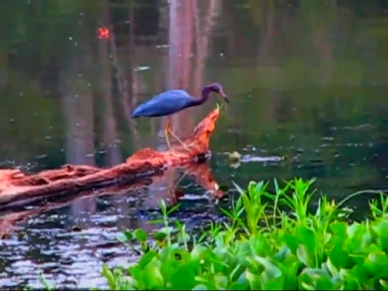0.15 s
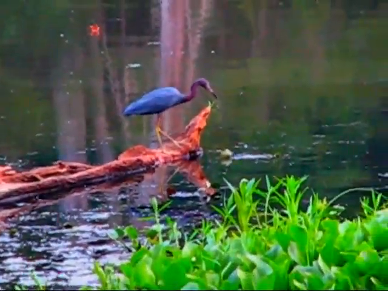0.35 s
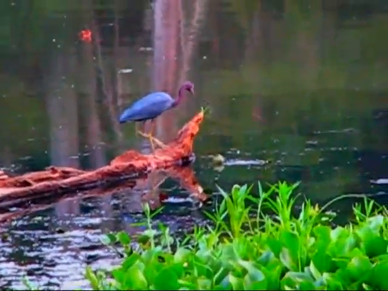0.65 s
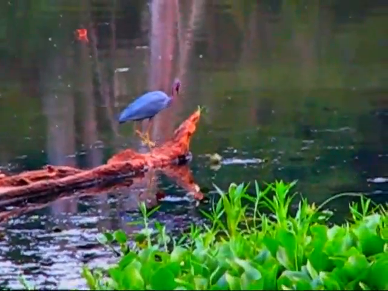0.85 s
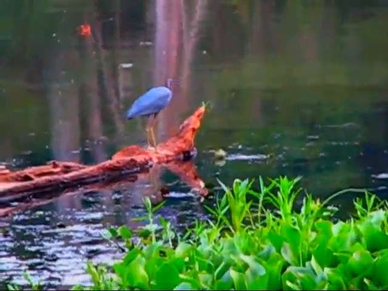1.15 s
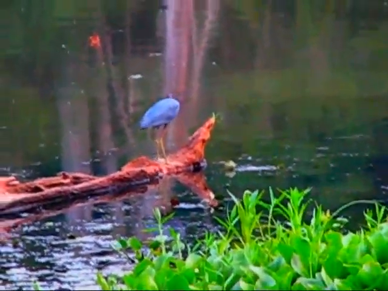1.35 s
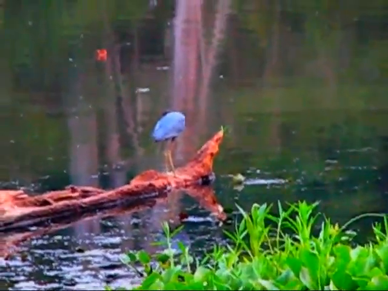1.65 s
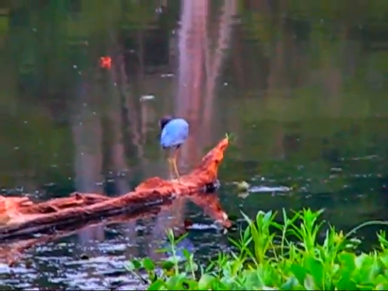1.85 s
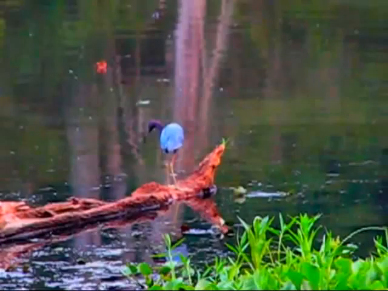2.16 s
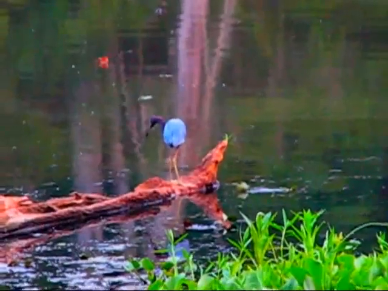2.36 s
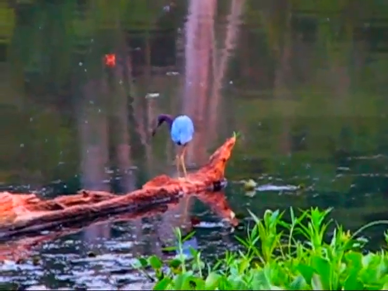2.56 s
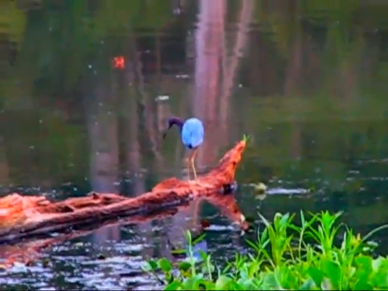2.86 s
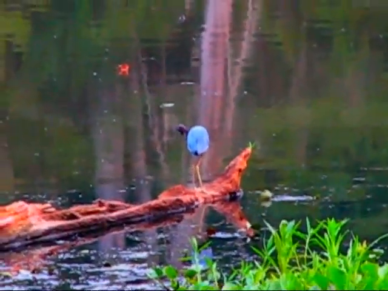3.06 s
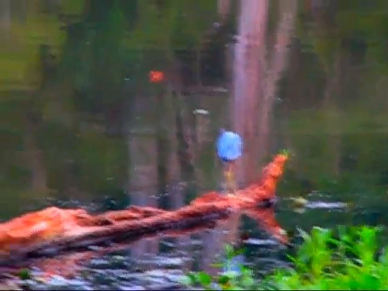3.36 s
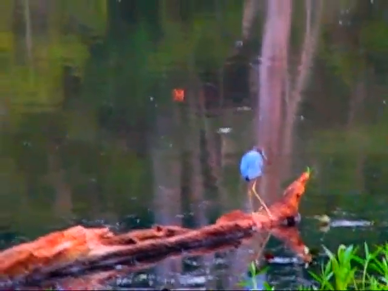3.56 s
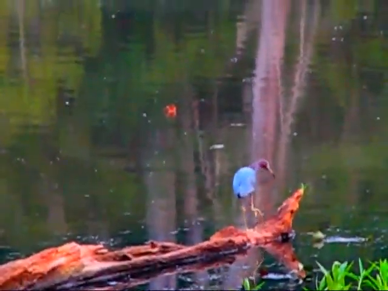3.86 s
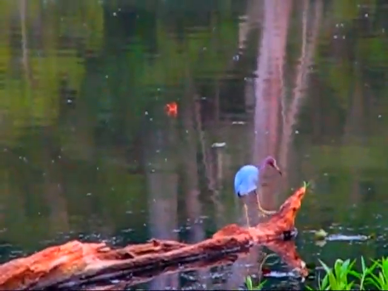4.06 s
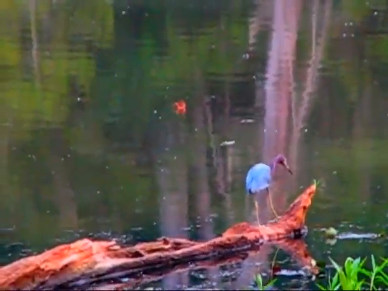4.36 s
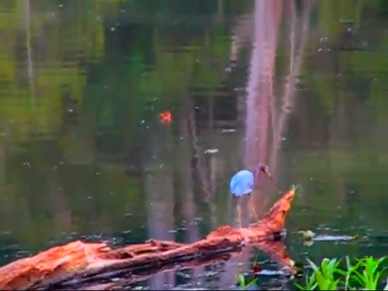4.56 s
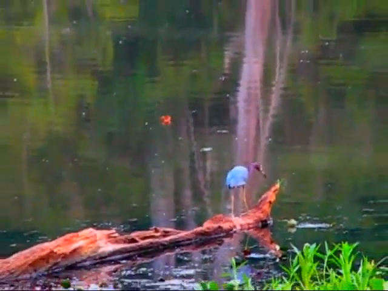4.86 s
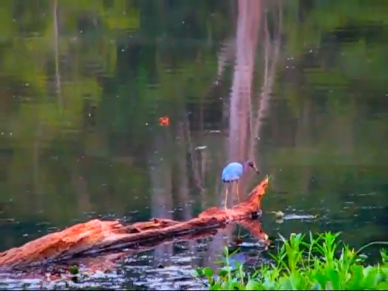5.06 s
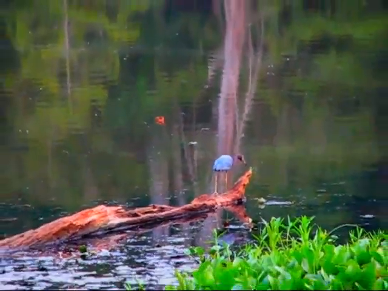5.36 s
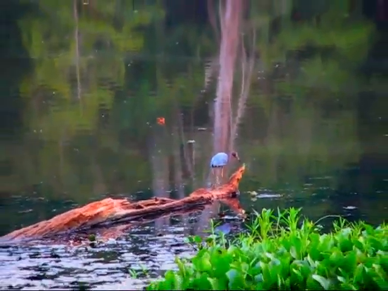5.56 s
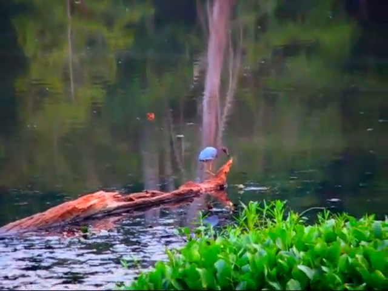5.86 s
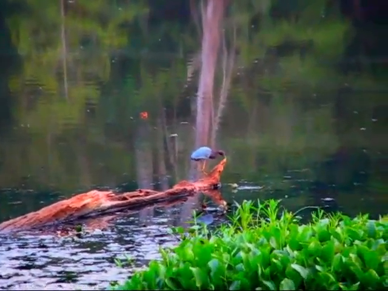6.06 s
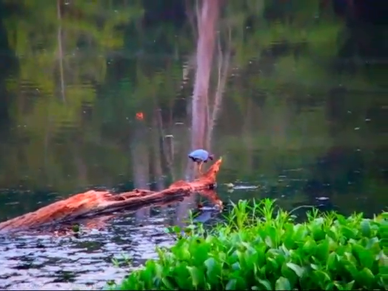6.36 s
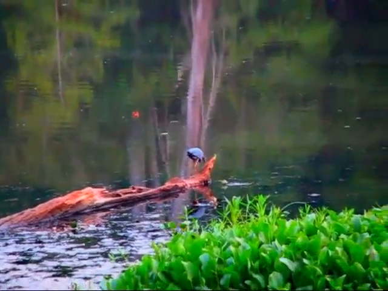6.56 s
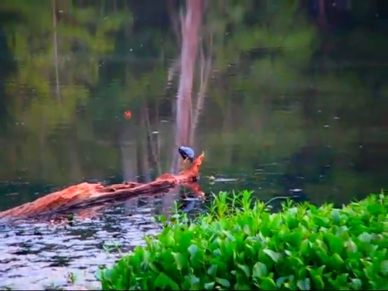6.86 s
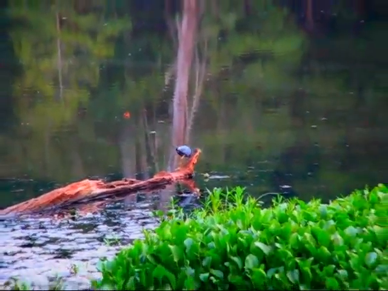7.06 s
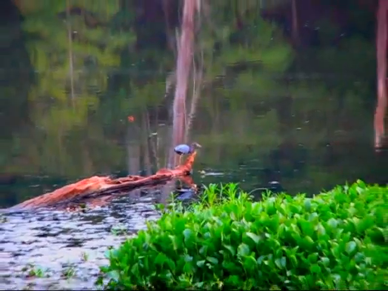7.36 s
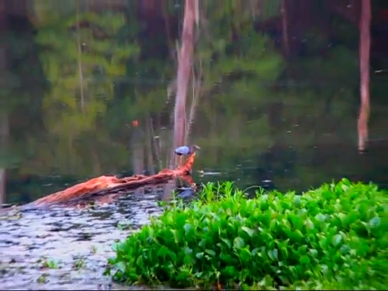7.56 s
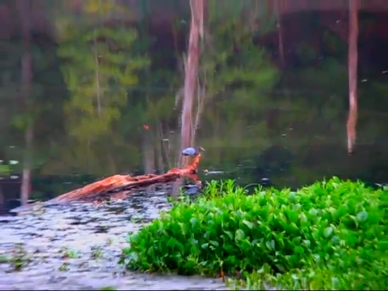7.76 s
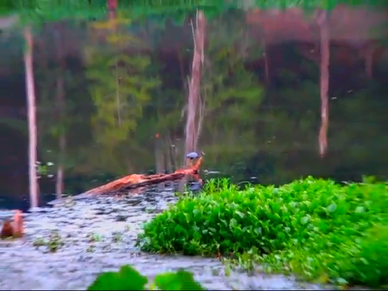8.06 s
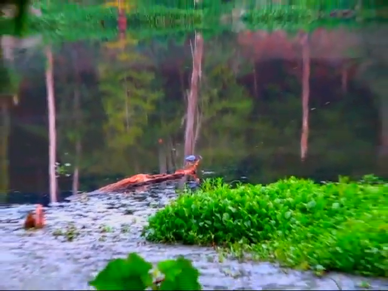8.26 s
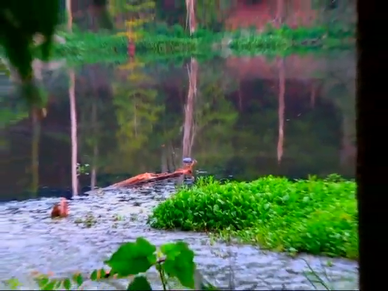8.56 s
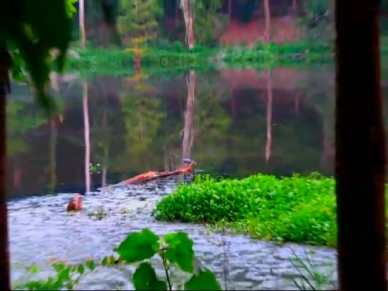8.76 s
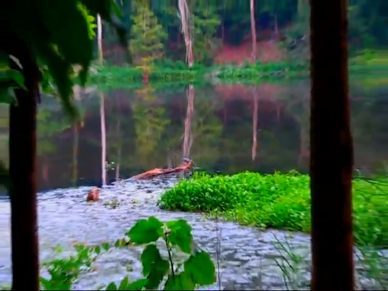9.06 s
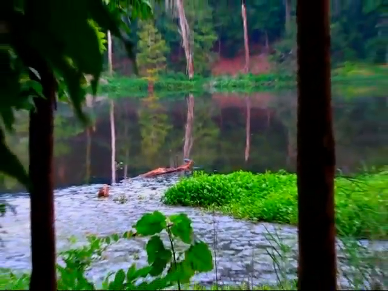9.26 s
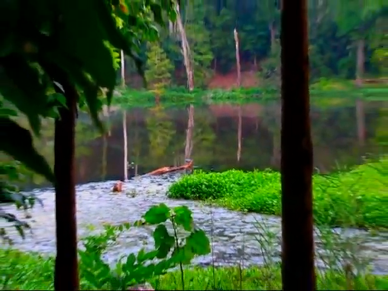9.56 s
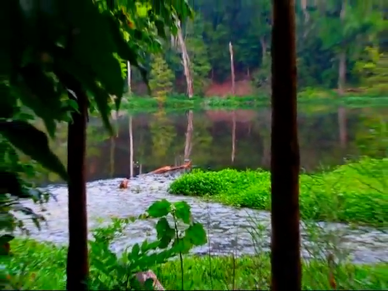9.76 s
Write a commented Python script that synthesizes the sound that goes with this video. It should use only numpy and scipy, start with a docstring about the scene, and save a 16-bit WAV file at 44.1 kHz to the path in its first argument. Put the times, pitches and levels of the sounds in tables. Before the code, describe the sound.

Summer pond insects shimmer continuously at high pitch while small frogs call back and forth; handling knocks arrive near six seconds, then a faint ticking zoom motor.

```python
"""A summer pond at dusk, heard at a hand-held camera: a wall of far cicadas over a low landscape hum,
with one nearer cicada, a near cricket trilling, katydids buzzing high up and tree frogs trading pulsed notes.
Crowds are shaped random spectra, cricket strokes sliding tones, and frog notes stacks of harmonics.
Knocks and thuds ring through the camera body; later the lens motor starts and rattles as random clicks."""
import sys
import numpy as np
from scipy import signal
from scipy.io import wavfile
from scipy.ndimage import uniform_filter1d

SR = 44100
rng = np.random.default_rng(int(sys.argv[2]) if len(sys.argv) > 2 else 0)


def store_pcm(level_fs):
    """Save levels as 16-bit WAV."""
    pcm = np.round(np.clip(level_fs, -1, 1) * 32767).astype(np.int16)
    wavfile.write(sys.argv[1], SR, np.atleast_2d(pcm).T)


N = 437031

# slow changes of the insects: time_s, cricket_db (before trim), katydids_db,
# second_colour_share (0-1), cicada_wall_db
INSECT_LEVELS = [(0, -28, -35, 0.44, -17.5), (1.2, -26, -30.5, 0.45, -18), (2.4, -25, -29.5, 0.35, -18),
                 (3.2, -23.5, -29, 0.55, -17.5), (4.6, -24, -32, 0.61, -18), (5.4, -23, -30.5, 0.65, -18),
                 (6.6, -24.5, -31.5, 0.73, -19), (8, -24.5, -32.5, 0.74, -17.5),
                 (9.91, -26, -32.5, 0.59, -18.5)]
# modes of the camera body: centre_hz, width_hz (before broadening), level_db, left_right_db
BODY_MODES = [(129, 150, -19, 13), (303, 142, 2.5, 0), (882, 172, 3.5, 15.5), (1316, 150, 7, -8),
              (1533, 263, 6.5, 4.5)]

FRAME = 256  # samples from one spectrum frame to the next
FRAMES = N // FRAME + 5
TREBLE_HZ = 4400  # the stereo image briefly widens above this


def gain_of(db):
    """Decibels to amplitude."""
    return 10 ** (np.asarray(db) / 20)


def evened(x):
    """Scales to rms 1."""
    return x / np.sqrt(np.mean(x ** 2) + 1e-20)


def read(points, hz):
    """Reads a spectrum table on a log-frequency axis; one that starts very low is near silent below its start."""
    f, value = np.transpose(points)
    below = -90 if value[0] < -20 else value[0]
    return np.interp(np.log(hz + 1), np.log(f + 1), value, below)


def curve(rows, count=1):
    """One column of a time table at every sample."""
    rows = np.array(rows)
    return np.interp(np.arange(N) / SR, rows[:, 0], rows[:, count])


def add(mix, s, sound):
    """Mixes a two-channel sound in at a time."""
    part = mix[:, round(s * SR):][:, :sound.shape[1]]
    part += sound[:, :part.shape[1]]


def sides(db):
    """Left and right gains for a left-right difference; positive is louder on the left."""
    return gain_of(np.array([[db / 2], [-db / 2]]))


def resonate(x, hz, width):
    """Shifts the curve hz down to zero, smooths, and shifts back: a resonance of gain 1."""
    turn = np.exp(2j * np.pi * np.cumsum(hz * np.ones(x.shape[-1])) / SR)
    r = np.exp(-np.pi * width / SR)
    smooth = signal.lfilter([1 - r], [1, -r], x / turn)
    return 2 * (turn * smooth).real


def waver(rate_hz):
    """Slow chance of rms 1: sines up to rate_hz with random starts, the slower ones stronger."""
    t = np.arange(0, N + 64, 64) / SR
    rates = np.geomspace(rate_hz / 20, rate_hz, 24)
    slow = sum(np.sin(2 * np.pi * (f * t + rng.random())) / np.sqrt(f) for f in rates)
    return np.repeat(evened(slow), 64)[:N]


def image_width():
    """How wide the treble image is, 0-1, frame by frame: a brief smooth hump at each moment."""
    # moments when the stereo image above 4400 Hz briefly widens: time_s
    moments = [.25, .53, 1.64, 1.78, 2.45, 2.7, 3.31, 3.73, 5.68, 6.01, 8.65, 9.19, 9.54]
    width_s, share = 0.089, 0.93
    t = np.arange(FRAMES) * FRAME / SR - FRAME / SR
    humps = sum(share * np.exp(-(2 * (t - s) / width_s) ** 4) for s in moments)
    return np.clip(humps, 0, 1)


def crowd(field_db, patchy_db, streak_db):
    """Many far sources as random short-time spectra: drifting patches, a fine ripple, thin standing-out streaks."""
    # likeness of the two sides: frequency_hz, likeness (0-1)
    likeness = [(60, 0.5), (140, 0.3), (330, 0.73), (770, 0.29), (1170, 0.55), (1790, 1), (2740, 0.11),
                (3600, 0.069), (4300, 0.066), (4600, 1), (8000, 1), (9500, 0.32), (10500, 0.44),
                (11000, 0.78), (13000, 0.97), (15000, 0.49)]
    # balance of the two sides: frequency_hz, left_right_db
    balance = [(60, 0.5), (150, 1), (380, 0.5), (950, 2), (2380, -1.5), (4200, 4), (5970, 0), (9500, -5.5),
               (12000, 0.5), (15000, 3.5)]
    hz = np.fft.rfftfreq(1024, 1 / SR)
    a, b, c, d, patches, streaks = rng.standard_normal((FRAMES, 513, 6)).T
    patches = uniform_filter1d(patches, size=10, axis=0)
    patches = evened(uniform_filter1d(patches, size=20, axis=1))
    streaks = evened(uniform_filter1d(streaks, size=24, axis=1))

    treble_width = image_width() * (hz > TREBLE_HZ)[:, None]
    same = np.clip(read(likeness, hz), -1, 1)[:, None] * (1 - treble_width)
    left, other = a + 1j * b, c + 1j * d
    z = np.array([left, same * left + np.sqrt(1 - same ** 2) * other])

    # paths over the water add and cancel, leaving a fine lasting ripple in the spectrum
    ripple_db = 1.4 * rng.standard_normal((513, 1))
    dip_db = -0.5 * treble_width  # the treble dips slightly while the image is wide
    level_db = field_db(hz) + patchy_db * patches + streak_db * streaks + ripple_db + dip_db
    half_lean = read(balance, hz)[:, None] / 2
    z *= gain_of(level_db) * gain_of([half_lean, -half_lean])
    return evened(signal.istft(z, nperseg=1024, noverlap=768)[1][:, :N])


def whines():
    """Thin tones that stand out of the wall, each a narrow band of noise coming and going."""
    # frequency_hz
    whine_hz = [4828, 4985, 5120, 5556, 5784, 5959, 6170]
    level_db, width_hz, waver_db = -23, 25, 3.5
    return sum(gain_of(level_db + waver_db * waver(3.))
               * evened(resonate(rng.standard_normal(N), hz, width_hz)) for hz in whine_hz)


def far_cicadas():
    """The wall of far cicadas, its colour passing from one group to another, with its thin whines."""
    # two colours of the wall as different cicadas lead: frequency_hz, density_db (per Hz)
    first_colour = [(1500, -43), (1900, -22.5), (2750, -3.5), (2900, 3), (3080, -5.5), (3850, 0.5),
                    (4050, 4.5), (5570, -7), (6870, -10), (8600, -6.5), (9900, -27.5), (15500, -27)]
    second_colour = [(1500, -52), (1900, -30), (2900, -7.5), (4200, -8), (4650, -2), (6200, 2.5),
                     (7200, -3.5), (8600, -11), (9900, -15.5), (15500, -30)]
    at_frames = np.minimum(np.arange(FRAMES) * FRAME, N - 1)
    share = np.clip(curve(INSECT_LEVELS, count=3), 0, 1)[at_frames]

    def colour_db(hz):
        """Blends the two colours in decibels."""
        return read(first_colour, hz)[:, None] * (1 - share) + read(second_colour, hz)[:, None] * share

    wall = crowd(colour_db, patchy_db=0.43, streak_db=2.0)
    return gain_of(curve(INSECT_LEVELS, count=4)) * (wall + whines())


def nearer_cicada():
    """One nearer cicada: noise through two resonances that slide up together, alike on both sides."""
    # the sliding buzz: time_s, pitch_hz, level_db
    slide = [(.1, 5380, -36), (.6, 5480, -27), (1.1, 5500, -27), (1.9, 5550, -28), (2.4, 5600, -41)]
    pitch_hz = curve(slide)
    buzz = resonate(rng.standard_normal(N), pitch_hz, 240.)
    buzz = evened(resonate(buzz, pitch_hz, 240.))
    return gain_of(curve(slide, count=2)) * buzz


def cricket():
    """Each wing stroke is a short tone that slides down; the leaves and water add an echo and lingering tones."""
    # pace of the wings; it slackens, picks up, and stumbles once: time_s, strokes_per_s
    pace = [(0, 50.45), (2.45, 48.57), (3.22, 51.51), (6.08, 52.11), (6.38, 49.37), (6.45, 53.22),
            (7.61, 51.31), (9.91, 52.57)]
    # lingering tones: frequency_hz, width_hz, level_db (relative)
    lingering = [(7480, 60, -4), (7700, 80, -5), (7820, 30, -3), (8000, 60, -6), (8133, 40, -2),
                 (8281, 30, -4), (8500, 30, -7)]
    # .7 of a stroke is already done at the start; the timing is uneven by .02 strokes rms
    strokes = .7 + np.cumsum(curve(pace)) / SR + .02 * waver(12.)
    number, stage = strokes.astype(int), strokes % 1
    strength_db, detune = rng.standard_normal((number.max() + 1, 2)).T
    closing = np.clip(stage / 0.52, 0, 1)  # the wings rub during this part of the cycle

    roughness_hz = 50 * evened(uniform_filter1d(rng.standard_normal(N), size=60))
    hz = (8650 - 1150 * closing) * (1 + .006 * detune[number]) + roughness_hz
    swell = np.sin(np.pi * closing ** 1.38) ** 1.15
    tone = np.sin(2 * np.pi * np.cumsum(hz) / SR) * swell
    tone = evened(tone * gain_of(strength_db[number]))

    rings = sum(gain_of(db) * resonate(tone, f, w) for f, w, db in lingering)
    # the echo takes a slightly longer path to the right
    echoes = np.array([gain_of(-9.0) * np.roll(tone, round(s * SR)) for s in (.0098, .0105)])
    # the cricket dips slightly while the treble image is wide
    dip_db = -0.91 * np.repeat(image_width(), FRAME)[:N]
    level_db = curve(INSECT_LEVELS) - 7.5 + dip_db + 0.26 * waver(6.5)
    return gain_of(level_db) * sides(0.58) * (tone + gain_of(11.5) * rings + echoes)


def katydids():
    """Broad high rasps, throbbing with the wing beat and in slower groups."""
    # colour of the rasp: frequency_hz, density_db (per Hz)
    rasp_colour = [(9400, -16), (9750, 5), (10100, -5.5), (10450, 3.5), (10900, -5.5), (12700, 2),
                   (13600, 0), (14800, -6), (15600, -19)]
    beat_hz = 54.0 + 0.89 * waver(2.99)
    group_hz = 15.5 + 1.47 * waver(2.2)
    beat = np.cos(2 * np.pi * np.cumsum(beat_hz) / SR)
    groups = np.cos(2 * np.pi * np.cumsum(group_hz) / SR)
    rasp = crowd(lambda hz: read(rasp_colour, hz)[:, None], patchy_db=1.0, streak_db=2.1)
    level_db = curve(INSECT_LEVELS, count=2) + 1.2 * beat + 1.1 * groups + 0.41 * waver(9.1)
    return gain_of(level_db) * rasp


def far_hum():
    """The far hum of the landscape: a low crowd that grows a little about two seconds in."""
    # colour of the hum: frequency_hz, density_db (per Hz)
    hum_colour = [(19, -38), (32, -24), (55, -9), (211, -1), (526, -1), (582, -4), (917, 1), (1120, -6),
                  (1800, -5), (2340, -1), (3960, -120)]
    level_db = np.interp(np.arange(N) / SR, [1.7, 2.2], [-46.5, -44.4])
    return gain_of(level_db) * crowd(lambda hz: read(hum_colour, hz)[:, None], patchy_db=1.5, streak_db=4.0)


def frog(length, hz, scoop, lead, db, who, chance):
    """A pulsed note of staggered harmonics, each reaching the two sides by its own path, higher ones more left."""
    # harmonics each vocal sac passes: multiple, level_db, lasting_share (of the note);
    # the third and fourth voices alternate strong and weak pulses
    sacs = [
        [(9, -1.5, 1), (10, -7, .4)],
        [(7, -6, 1), (8, -4, .8), (9, -8, 1)],
        [(13, -6, .7), (15, -1, 1), (17, -4, .35), (19, -4, .2)],
        [(13, 0, .55), (15, -11, 1), (17, -5, 1.3)],
        [(9, -10, .8), (10, -1, 1), (11, 0, .4), (12, -2, .3)],
        [(8, -3, .8), (9, -2, .5)],
    ]
    t = np.arange(round((1.7 * length + .1) * SR)) / SR - .05
    scoop_up = scoop * np.exp(-(t + .05) / .04)  # the scoop up to pitch
    wobble = .002 * np.cos(2 * np.pi * (8 * t + chance[0]))
    turns = np.cumsum(hz * (1 - scoop_up + wobble)) / SR
    lag = np.array([[0], [1]]) * (chance[20:] - .7) * .3  # turns by which the right side differs
    note = 0
    for k, line_db, lasts in sacs[who]:
        early_s = lead * (k * hz - 3200) / 1000
        stage = np.clip((t + early_s) / (1.35 * length * lasts) + .1, 0, 1)
        ramp = np.minimum(np.minimum(stage / .2, (1 - stage) / .5), 1)
        swell = np.sin(np.pi / 2 * ramp) ** 2
        # a 40 Hz flutter breaks up the tail
        flutter_db = 5 * stage * (np.cos(2 * np.pi * (40 * t + chance[20 + k])) - 1)
        pan = sides(6 * (k * hz - 2950) / 1000)
        tone = np.sin(2 * np.pi * (k * turns + chance[k] + lag[:, [k]]))
        note = note + gain_of(line_db + flutter_db) * swell * pan * tone
    return np.sqrt(2) * gain_of(db - 0.5) * note


def frogs(mix):
    """Tree frogs trading notes; most voices pulse faster as they warm up."""
    # the notes: start_s, length_s (nominal), level_db (before trim), voice (index)
    notes = [(.1, .13, -21, 2), (.76, .2, -30, 5), (1.82, .15, -26, 5), (2.34, .2, -31, 1),
             (2.81, .16, -29, 5), (3.17, .09, -30, 1), (3.3, .06, -29, 2), (3.69, .24, -27, 5),
             (3.96, .13, -28, 1), (4.29, .07, -26, 2), (4.64, .2, -31, 5), (4.77, .12, -26, 1),
             (5.49, .12, -27, 0), (5.5, .17, -28, 1), (5.88, .09, -30, 3), (6.26, .15, -30, 1),
             (6.4, .11, -22, 0), (6.69, .09, -29, 3), (6.97, .14, -29, 1), (7.285, .11, -27, 0),
             (7.515, .08, -26, 3), (7.725, .07, -26, 1), (8.125, .13, -26, 0), (8.275, .08, -26, 3),
             (8.44, .09, -29, 1), (9.03, .07, -28, 3), (9.515, .055, -24, 4), (9.735, .08, -27, 4)]
    # fundamental of each voice: start_hz, final_gain_hz, warm_up_s, flat_start_share,
    # lead_of_higher_harmonics_s_per_khz; the last is the first frog's earlier note, which climbs
    warming = [(365.5, 22, 10, 0, .03), (417, 9.5, 2.7, 0, .03), (211.4, 20, 20, 0, .03),
               (211.8, 20, 20, 0, .03), (381, 0, 1, .04, .03), (365.5, 22, 10, 0, -.27)]
    for (s, length, db, who), chance in zip(notes, rng.random((len(notes), 60))):
        start_hz, gain_hz, warm_s, scoop, lead = warming[who]
        hz = start_hz + gain_hz * (1 - np.exp(-s / warm_s))
        add(mix, s - .05, frog(length, hz, scoop, lead, db, who, chance))


def body(blows, shares_db):
    """The plastic shell rings, each mode swelling softly; where it is struck sets the share of each mode."""
    total = 0
    for k, (hz, width, db, pan_db) in enumerate(BODY_MODES):
        ring = resonate(resonate(blows, hz, 2.33 * width), hz, 2.33 * width)
        level = (-1) ** k * gain_of(db + shares_db[k]) / np.sqrt(width)
        total = total + level * sides(pan_db) * ring
    return total


def knock(db, low_db):
    """A blow and a few quick rattles ring the shell; low_db sets how strongly the blow moves the lower modes."""
    rattle = rng.standard_normal(1500)
    dying = np.exp(-np.arange(len(rattle)) / 300.)
    blows = signal.unit_impulse(len(rattle)) + .3 * rattle * (abs(rattle) > 2.4) * dying
    blows = uniform_filter1d(np.roll(blows, 8), size=12)  # a soft contact: little treble
    ring = body(blows, [low_db - 18.0, low_db - 24.0, low_db + 4.5, 0, 0])
    # the level is set against the peak of the two highest modes
    reference = abs(body(blows, [-60, -60, -60, -3.5, 5.5])).max()
    return gain_of(db + 2.5) * ring / reference


def knocks(mix):
    """Knocks in the camera body as the hand shifts and the motor engages."""
    # time_s, level_db (before trim), low_modes_db (relative)
    blow_list = [(2.6856, -28, -13), (3.454, -28.5, -2), (5.8076, -27, -17), (5.88, -24, -9),
                 (5.902, -21, -7), (5.9224, -29.5, 12.5), (5.9315, -18, -12), (5.944, -23, -6),
                 (5.9636, -19, -8), (5.9802, -23.5, 2), (6.006, -31, 0), (6.025, -20, 3),
                 (6.0425, -18.5, -9), (6.5764, -31, 5), (9.7866, -21, -6)]
    for s, db, low_db in blow_list:
        add(mix, s, knock(db, low_db))


def motor():
    """Gear teeth click unevenly into the camera body, heard partly apart on each side."""
    # lens motor: time_s, level_db (before trim)
    run = [(5.8, -50), (5.95, -42), (6.3, -35), (7.2, -35.5), (8.3, -34), (9.91, -37.5)]
    strength = gain_of(1.4 * np.minimum(rng.exponential(1, (3, N)), 5))
    struck = rng.random((3, N)) < 1200 / SR  # about 1200 clicks per s in each stream
    clicks = strength * struck * rng.choice([-1, 1], (3, N))
    clicks = clicks[0] + 0.37 * clicks[1:]  # one shared stream and one for each side
    clicks = uniform_filter1d(clicks, size=12)  # soft teeth: little treble
    running = np.clip((np.arange(N) / SR - run[0][0]) / 0.066, 0, 1)
    level_db = curve(run) - 1.8 + 1.33 * waver(40.)
    return gain_of(level_db) * running * evened(body(clicks, np.zeros(len(BODY_MODES))))


def ticks(mix):
    """Once a turn a gear of the running motor knocks the shell, evenly spaced and a little uneven in strength."""
    first_s, every_s = 6.2387, .4942
    for s in np.arange(first_s, N / SR, every_s):
        add(mix, s, knock(-21 + 5 * rng.standard_normal(), low_db=-11))


def thud(db):
    """A low bump: a few cycles of the shell's second mode."""
    turns = np.arange(1200) / SR * BODY_MODES[1][0]
    swell = turns * np.exp(1 - turns * 1.6)
    return gain_of(db + 3.0) * np.ones((2, 1)) * swell * np.sin(2 * np.pi * turns)


def thuds(mix):
    """Low bumps of the grip."""
    # time_s, level_db (before trim)
    bumps = [(6.337, -28), (6.576, -25)]
    for s, db in bumps:
        add(mix, s, thud(db))


def scene():
    """All singers, the far hum and the camera's own noise."""
    mix = far_cicadas() + nearer_cicada() + cricket() + katydids() + far_hum()
    frogs(mix)
    knocks(mix)
    mix += motor()
    ticks(mix)
    thuds(mix)
    return mix


def record(dry):
    """The microphone's bass roll-off, then the band limit."""
    roll_off = signal.butter(2, 33., "highpass", fs=SR, output="sos")
    thinned = signal.sosfilt(roll_off, dry)
    band_limit = signal.firwin(511, 15450, window=("kaiser", 9), fs=SR)  # treble edge in Hz
    return signal.oaconvolve(thinned, band_limit[None], "same")


dry = scene()
out = record(dry)
store_pcm(out)
```